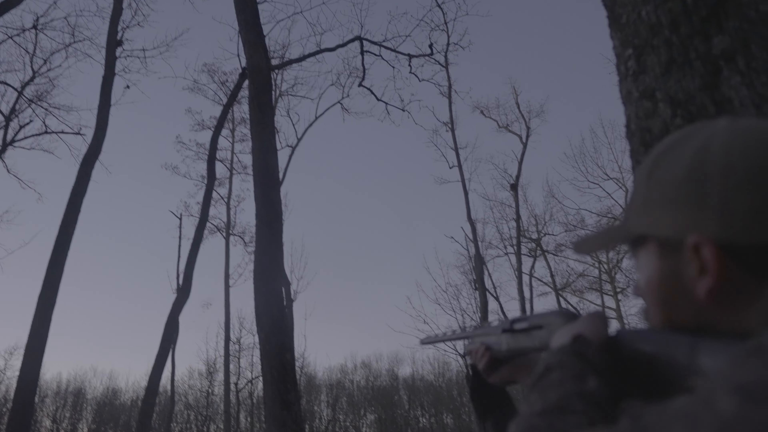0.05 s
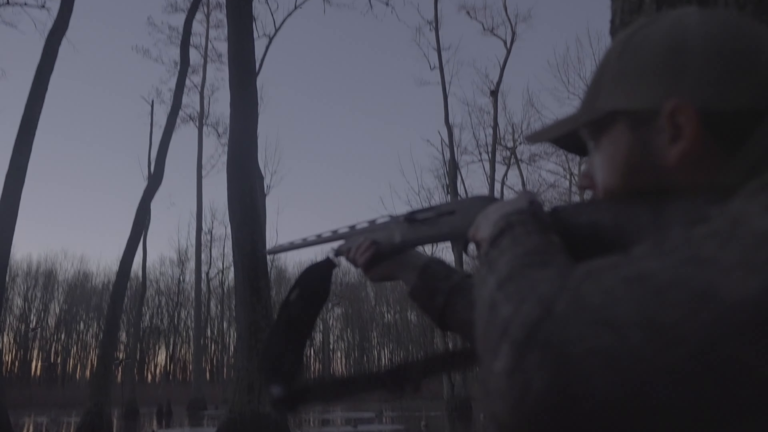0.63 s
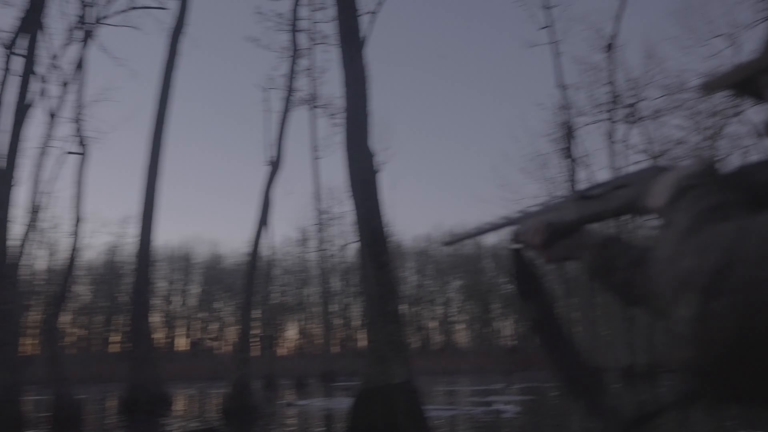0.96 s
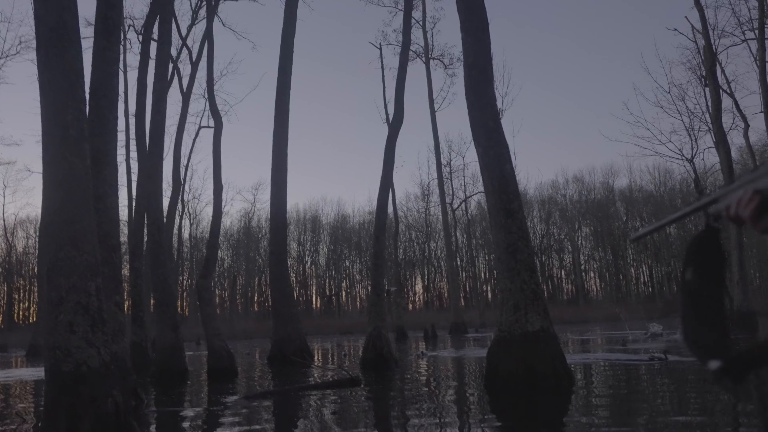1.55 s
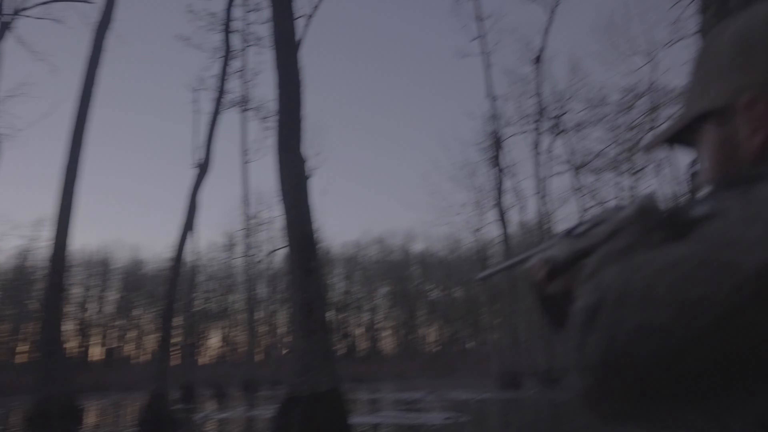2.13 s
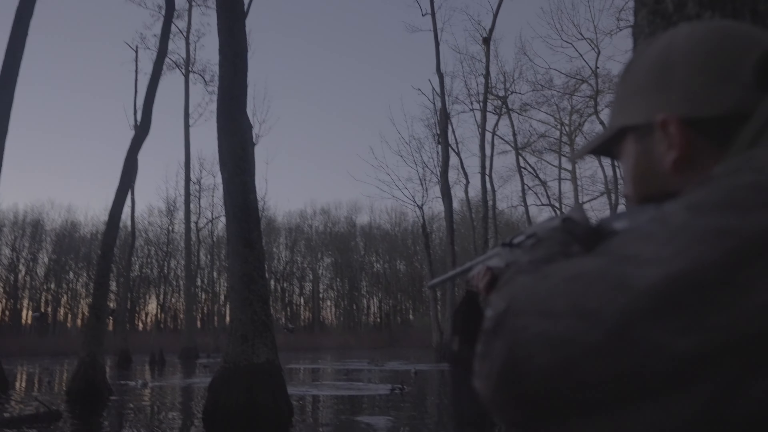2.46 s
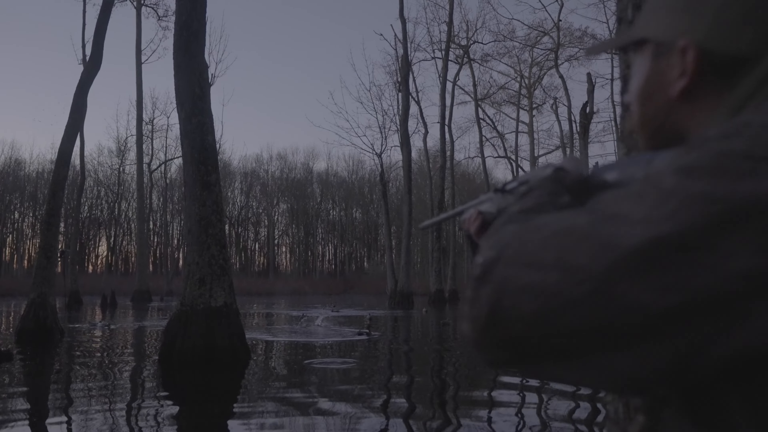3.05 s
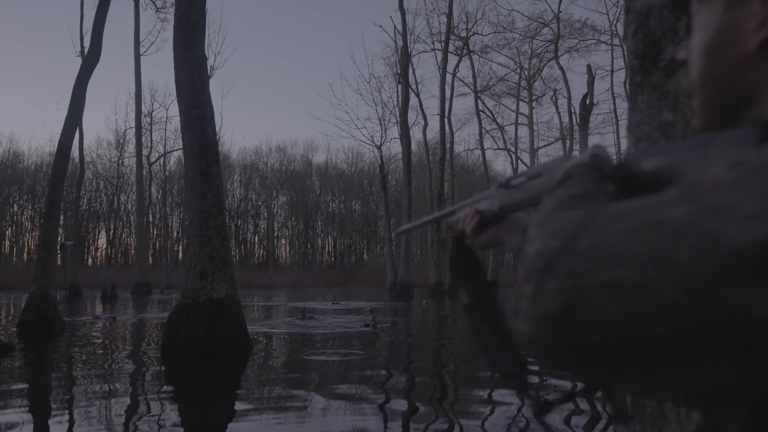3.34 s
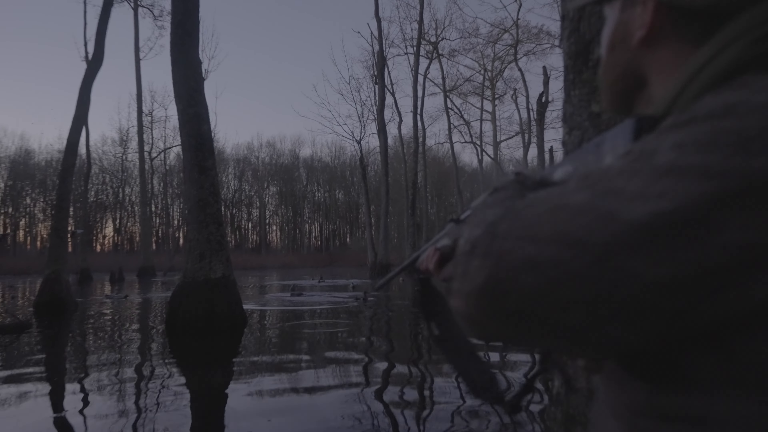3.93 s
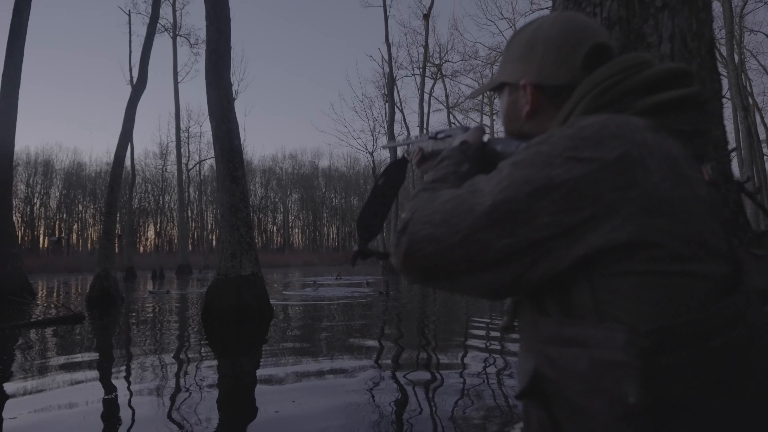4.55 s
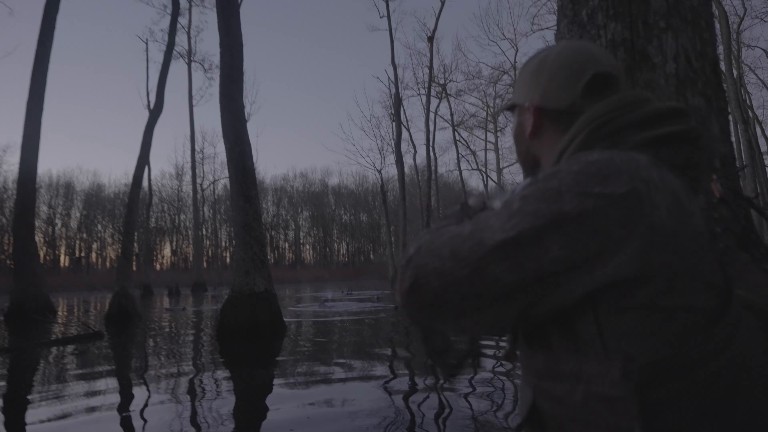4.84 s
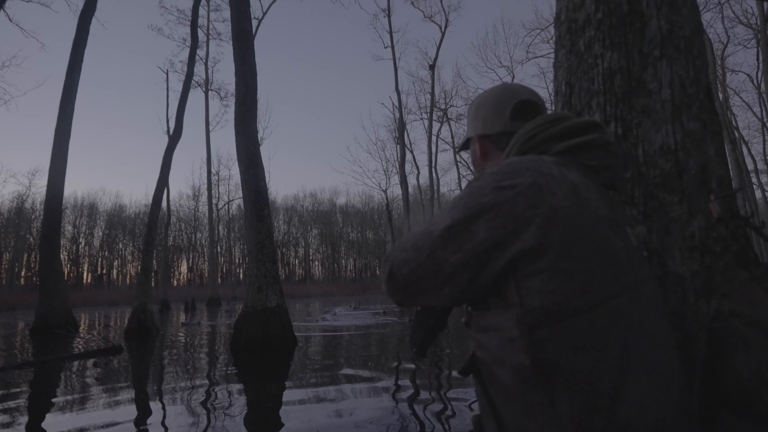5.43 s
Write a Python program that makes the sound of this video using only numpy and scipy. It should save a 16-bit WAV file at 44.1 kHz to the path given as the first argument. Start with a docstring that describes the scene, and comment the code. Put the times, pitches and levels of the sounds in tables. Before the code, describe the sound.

Two loud, slightly distorted shotgun blasts go off a step from the microphone in a wooded swamp, following the fading tail of a previous shot. Each cracks back off the trees and trails into a long rumbling echo. As the last one dies away, the gun is lowered with soft cloth rustling, light sling ticks and a few small metallic clicks against faint outdoor air.

```python
"""Shotgun in a flooded wood

A hunter fires twice, a step from the microphone; an earlier shot is already rolling at the start.
Each blast overloads the microphone, slaps off nearby trunks and rolls away through the trees,
the far shore answering after half a second. He lowers the gun: his jacket rustles, the fittings click."""
import sys
import numpy as np
from scipy import signal
from scipy.io import wavfile
from scipy.ndimage import uniform_filter1d

SR = 44100
rng = np.random.default_rng(int(sys.argv[2]) if len(sys.argv) > 2 else 0)


def store_pcm(level_fs):
    """Save levels as 16-bit WAV."""
    pcm = np.round(np.clip(level_fs, -1, 1) * 32767).astype(np.int16)
    wavfile.write(sys.argv[1], SR, np.atleast_2d(pcm).T)


N = 250910


def amp(db):
    """Decibels to gain."""
    return 10 ** (np.asarray(db) / 20)


def unit_rms(x):
    """Scale to rms 1."""
    return x / np.sqrt(np.mean(x ** 2) + 1e-20)


def bell(x, middle, half_width):
    """Gaussian of height 1."""
    return np.exp(-((x - middle) / half_width) ** 2)


def curve_at(points, hz):
    """Interpolate a table on a log-frequency axis."""
    freq_hz, value = np.transpose(points)
    return np.interp(np.log(hz + 1), np.log(freq_hz + 1), value)


def add(mix, start_s, sound):
    """Mix in a sound; start_s may be negative."""
    at = round(start_s * SR)
    sound = sound[max(-at, 0):]
    part = mix[max(at, 0):][:len(sound)]
    part += sound[:len(part)]


def band(x, low_hz, high_hz, order=3):
    """Butterworth band-pass."""
    edges_hz = np.clip([low_hz, max(high_hz, low_hz + 20)], 1, SR / 2 - 1)
    return signal.sosfilt(signal.butter(order, edges_hz, "bandpass", fs=SR, output="sos"), x)


def colour(x, spectrum, size=8192):
    """Minimum-phase filter of unit energy, shaped to a spectrum table."""
    hz = abs(np.fft.fftfreq(size, 1 / SR))
    log_gain = np.log(amp(curve_at(spectrum, hz)))
    response = np.exp(np.conj(signal.hilbert(log_gain)))
    taps = np.fft.ifft(response).real[:size // 2]
    return signal.oaconvolve(x, taps / np.linalg.norm(taps))[:len(x)]


def grains(samples, per_s, spread_db=0):
    """Random impulses of either sign; spread_db makes a few much larger."""
    size = amp(spread_db * np.minimum(rng.exponential(1, samples), 4))
    sign = rng.choice([-1, 1], samples)
    occurs = rng.random(samples) < per_s / SR
    return unit_rms(size * sign * occurs)


# First rebounds off water, tree and shooter: freq_hz, level_db
REBOUND_SPECTRUM = [(25, -23.5), (60, -20.5), (150, -5.5), (350, 4.5), (800, -2), (1600, -8), (4000, -20),
                    (15000, -54.5)]


def blast(level_db, push_s, thump_db, rebound_s=0.0055, gas_s=0.041):
    """Muzzle shock, push then suck; close rebounds; bark and thump of the expanding gas."""
    t = np.arange(SR // 3) / SR
    noise = rng.standard_normal((3, len(t)))
    shock = (1 - t / push_s) * np.exp(-t / push_s)
    rebounds = amp(-5) * unit_rms(colour(noise[0], REBOUND_SPECTRUM)) * np.exp(-t / rebound_s)
    bark = amp(-18) * unit_rms(band(noise[1], low_hz=185, high_hz=426.7)) * np.exp(-t / gas_s)
    thump = unit_rms(band(noise[2], low_hz=28, high_hz=90, order=2)) * bell(t, 0, gas_s)
    return amp(level_db) * (shock + (rebounds + bark) * (t > push_s)) + amp(thump_db) * thump


# Blast as scattered by the wood: freq_hz, level_db
ROLL_SPECTRUM = [(25, -43.5), (60, -25.5), (100, -9.5), (160, 0), (300, 2), (450, 1), (650, -6.5),
                 (1000, -7.5), (1400, -9), (2000, -15), (3500, -20.5), (5000, -27.5), (8000, -38),
                 (13000, -46.5), (17000, -58)]
# Extra loss in air and brush: freq_hz, loss_db_per_s
PATH_LOSS = [(30, 18.5), (60, -2.5), (100, 1.5), (300, 2.57), (650, 3), (1200, 5), (2000, 7.5),
             (3500, 14.5), (5000, 23.5), (8000, 42), (13000, 54.5)]
# Tree stands swell the roll, open water thins it: delay_s, half_width_s, gain_db
TERRAIN_GAINS = [(.075, .04, -2.5), (.265, .06, 1), (0.412, 0.055, -2)]


def roll(level_db, boom_db, shore_db, boom_hz=500, boom_octaves=0.32, shore_s=0.486, knee_s=1.474):
    """Thousands of trunks each return the blast; the longer the path, the fainter and duller."""
    t = np.arange(N + SR // 2) / SR
    clumps_db = -0.08 * unit_rms(uniform_filter1d(rng.standard_normal(len(t)), size=500))
    spreading_db = -89.5 * np.log10(1 + t / knee_s)
    terrain_db = sum(db * bell(t, delay_s, half_s) for delay_s, half_s, db in TERRAIN_GAINS)
    answer_db = shore_db * bell(t, shore_s, half_width=0.04)
    returns = grains(len(t), per_s=2500 + 5000 * t)
    returns *= amp(spreading_db + terrain_db + answer_db + clumps_db)
    hz, lag_s, spectra = signal.stft(colour(returns, ROLL_SPECTRUM), SR, nperseg=512, noverlap=384)
    aim_db = boom_db * bell(np.log2((hz + 1) / boom_hz), 0, boom_octaves)  # set by barrel direction
    patches = uniform_filter1d(rng.standard_normal(spectra.shape), size=6, axis=0)
    thickets_db = 1.2 * unit_rms(uniform_filter1d(patches, size=12, axis=1))  # each has its own colour
    loss_db = curve_at(PATH_LOSS, hz)[:, None] * lag_s
    spectra *= amp(aim_db[:, None] + thickets_db - loss_db)
    _, sound = signal.istft(spectra, SR, nperseg=512, noverlap=384)
    return amp(level_db - 0.58) * sound[:len(t)]


# Shots: start_s, blast_db, push_s, thump_db, roll_db, boom_db, shore_db
GUNSHOTS = [(-0.39, 22, .0009, -14, 1.5, 0.5, 0), (1.0531, 19.5, 0.00095, -54, 3, -3.5, 3),
            (2.3119, 19, .0007, -11, 3.5, -6, 2.5)]


def gunshots(mix):
    """Each shot is a muzzle blast and its roll through the wood."""
    for start_s, blast_db, push_s, thump_db, roll_db, boom_db, shore_db in GUNSHOTS:
        add(mix, start_s, blast(blast_db, push_s, thump_db))
        add(mix, start_s, roll(roll_db, boom_db, shore_db))


# Still air over the swamp: freq_hz, level_db
AIR_SPECTRUM = [(25, -1.5), (60, -1), (150, 4), (300, -4), (650, -19), (1200, -24.5), (2000, -33.5),
                (3500, -39), (5000, -45), (8000, -56.5), (15000, -66)]


def still_air(level_db=-46.5):
    """Faint, steady low noise of the open air."""
    return amp(level_db) * colour(rng.standard_normal(N), AIR_SPECTRUM)


# Rubbing cloth: freq_hz, level_db
CLOTH_SPECTRUM = [(300, -16), (1500, 1.5), (2200, 4.5), (3000, -2.5), (3800, 2.5), (5500, -12.5),
                  (8000, -14.5), (12000, -18.5), (16000, -30)]
# Hunter's movements: middle_s, length_s, level_db
MOVEMENTS = [(0.05, .4, -58.5), (0.651, .8, -68.5), (2.299, 1.0, -69.5), (3.1, .7, -74.5),
             (4.592, 0.082, -68), (4.8, .14, -65), (5.1, 0.43, -66.5), (5.553, 0.33, -61)]


def jacket(snap_db=-2, rub_db=-5, crinkle_db=1.7, decay_cycles=1.9):
    """Stiff cloth rubs and crackles in bursts as the hunter moves; each fold snaps at its own pitch."""
    t = np.arange(SR // 100) / SR
    snaps = np.zeros(N)
    for hz in np.geomspace(1200, 14000, 24):
        age = hz * t / decay_cycles
        snap = np.sin(2 * np.pi * hz * t) * age * np.exp(-age)
        folds = grains(N, per_s=hz / 30, spread_db=4.2)
        snaps += hz * signal.oaconvolve(folds, snap)[:N]
    friction = amp(snap_db) * unit_rms(snaps) + amp(rub_db) * rng.standard_normal(N)
    time_s = np.arange(N) / SR
    movement = sum(amp(db) * bell(time_s, middle_s, length_s / 2) for middle_s, length_s, db in MOVEMENTS)
    bursts = unit_rms(uniform_filter1d(rng.standard_normal(N), size=400))
    return movement * amp(crinkle_db * bursts) * unit_rms(colour(friction, CLOTH_SPECTRUM))


# Echoes off clumps of trees: start_s, peak_db, decay_s, centre_hz
TRUNK_ECHOES = [(0.078, -23, .001, 740), (0.122, -5.5, .006, 494), (0.136, -6, 0.037, 415),
                (0.204, -10, .016, 410), (0.260, -13.5, .012, 380), (1.068, 5.5, 0.011, 950),
                (1.080, 17, 0.0058, 644), (1.137, -10, 0.011, 1190), (1.166, -4.5, 0.0084, 1400),
                (1.168, 1, 0.016, 188), (1.217, -9.5, .004, 1600), (1.327, -10.5, .0077, 1450),
                (1.34, -3.5, 0.013, 307), (1.517, -7.5, 0.021, 566), (2.333, 12, 0.0055, 1200),
                (2.3373, 18, 0.0049, 1510), (2.357, 13, 0.0026, 1100), (2.422, 5, 0.0036, 1360),
                (2.437, -7.5, 0.0053, 2610), (2.46, -6.5, 0.0037, 800), (2.793, -10.5, 0.032, 520)]


def trunk_echoes(mix, width_octaves=1.3):
    """Each clump returns a short, ragged slap, coloured by trunk size and spacing."""
    t = np.arange(SR // 12) / SR
    edge_ratio = 2 ** (width_octaves / 2)
    for start_s, peak_db, decay_s, centre_hz in TRUNK_ECHOES:
        burst = rng.standard_normal(len(t)) * bell(t, 0, decay_s)
        slap = band(burst, centre_hz / edge_ratio, centre_hz * edge_ratio)
        add(mix, start_s, amp(peak_db) * slap / abs(slap).max())


# Sleeves sliding as the gun swings: start_s, length_s, level_db, centre_hz
SLEEVE_SWISHES = [(0.39, .10, -76, 9900), (0.95, .13, -62.5, 4850), (1.9, 0.5, -70, 4940),
                  (3.08, .12, -78, 10000), (4.72, 0.093, -78.5, 5930)]


def sleeve_swishes(mix, width_octaves=0.22):
    """Woven cloth sliding on itself hisses around its thread-crossing rate."""
    edge_ratio = 2 ** (width_octaves / 2)
    for start_s, length_s, level_db, centre_hz in SLEEVE_SWISHES:
        noise = rng.standard_normal(round(length_s * SR))
        hiss = unit_rms(band(noise, centre_hz / edge_ratio, centre_hz * edge_ratio, order=1))
        add(mix, start_s, amp(level_db) * hiss * np.sqrt(np.hanning(len(hiss))))


# Ringing modes of the fittings: pitch_hz, level_db, t60_s
FITTING_MODES = [(1420, -7.5, .03), (2080, 8.5, .05), (2270, 8, 0.044), (2840, -14, .025), (3530, -5, .025),
                 (3970, -6.5, .025), (5540, -5, .025)]


def click(peak_db, decay_s, spot_db=3, ring_db=-43):
    """A brief scrape, coloured by the spot touched, sets the fittings ringing."""
    t = np.arange(SR // 6) / SR
    scrape = colour(rng.standard_normal(len(t)) * np.exp(-t / decay_s), CLOTH_SPECTRUM)
    spot_hz = 3500 * rng.uniform(0.7, 1.4)
    scrape += amp(spot_db) * band(scrape, 0.85 * spot_hz, 1.15 * spot_hz, order=1)
    modes = sum(amp(db - 60 * t / t60_s) * np.sin(2 * np.pi * hz * t) for hz, db, t60_s in FITTING_MODES)
    sound = scrape + amp(ring_db) * signal.fftconvolve(scrape, modes)[:len(t)]
    return amp(peak_db) * sound / abs(sound).max()


# Knocks of the fittings: start_s, peak_db, decay_s
FITTING_KNOCKS = [(0.952, -43, .003), (1.863, -41, .001), (2.115, -44, 0.0038), (2.886, -32, .001),
                  (3.3266, -39, .0015), (4.541, -51, .003), (5.317, -44.5, 0.0033), (5.454, -44, 0.0068),
                  (5.484, -44, 0.0062), (5.531, -37, 0.0048), (5.5411, -33, .008), (5.568, -42, .005)]


def fitting_knocks(mix):
    """Gun and sling fittings knock as the gun is handled."""
    for start_s, peak_db, decay_s in FITTING_KNOCKS:
        add(mix, start_s, click(peak_db, decay_s))


def sling_rattle(mix, start_s=4.98, end_s=5.38, ticks=8):
    """The sling ticks lightly and unevenly as the gun comes down."""
    slot_s = (end_s - start_s) / ticks
    for tick_s in start_s + slot_s * (np.arange(ticks) + rng.random(ticks)):
        add(mix, tick_s, click(peak_db=-54, decay_s=0.005))


def scene():
    """Shots, echoes and gun handling over still air; mono."""
    mix = jacket() + still_air()
    gunshots(mix)
    trunk_echoes(mix)
    sleeve_swishes(mix)
    fitting_knocks(mix)
    sling_rattle(mix)
    return mix[None]


def record(dry, limit_db=-9.0, follow_s=0.0063, low_cut_hz=68, high_cut_hz=15900):
    """Input stage flattens the peaks; then a fast rms limiter, wind filter and band limit."""
    clipped = dry / (1 + dry ** 12) ** (1 / 12)
    pole = np.exp(-1 / (follow_s * SR))
    rms = np.sqrt(signal.lfilter([1 - pole], [1, -pole], clipped ** 2))
    limited = clipped / np.maximum(rms / amp(limit_db), 1)
    filtered = band(limited, low_cut_hz, high_cut_hz, order=2)
    steep_lowpass = signal.firwin(511, high_cut_hz, window=("kaiser", 9), fs=SR)
    return signal.oaconvolve(filtered, steep_lowpass[None], "same")


dry = scene()
out = record(dry)
store_pcm(out)
```